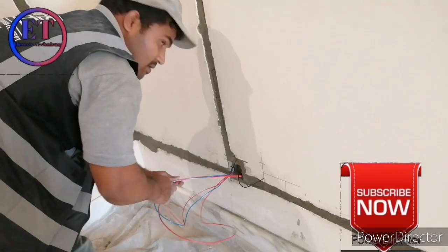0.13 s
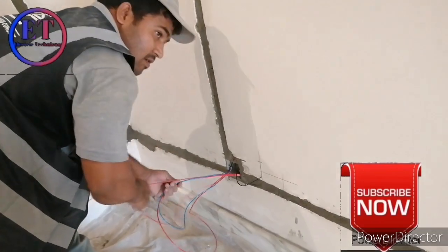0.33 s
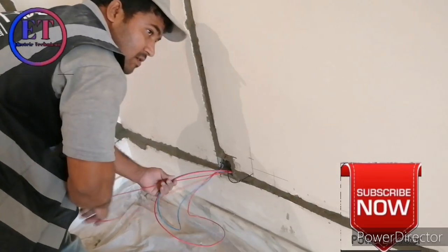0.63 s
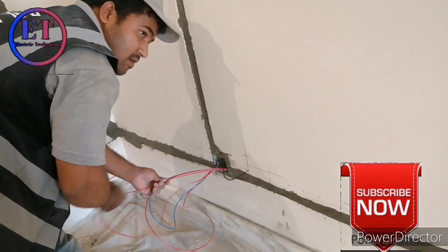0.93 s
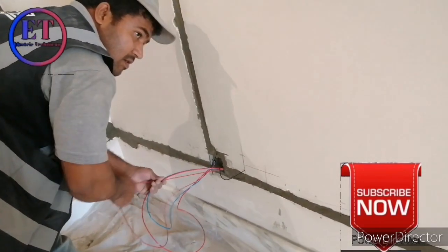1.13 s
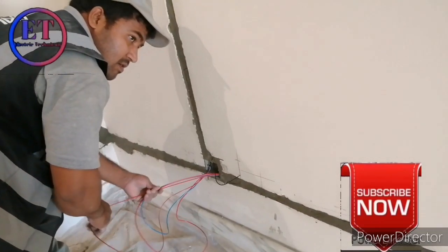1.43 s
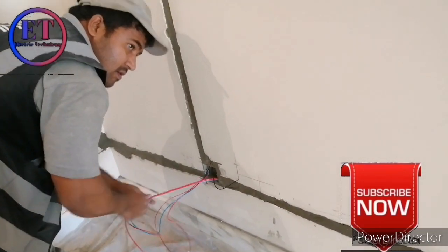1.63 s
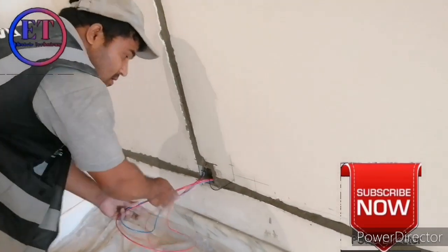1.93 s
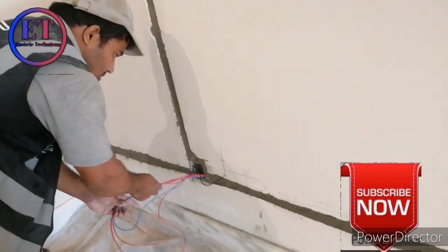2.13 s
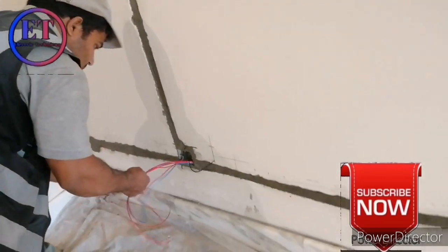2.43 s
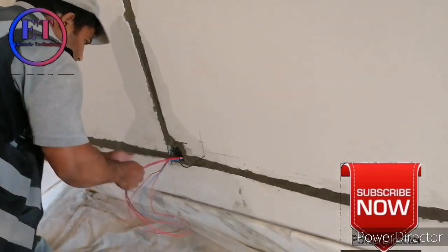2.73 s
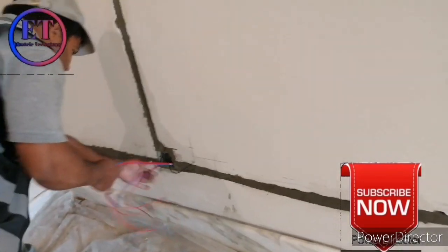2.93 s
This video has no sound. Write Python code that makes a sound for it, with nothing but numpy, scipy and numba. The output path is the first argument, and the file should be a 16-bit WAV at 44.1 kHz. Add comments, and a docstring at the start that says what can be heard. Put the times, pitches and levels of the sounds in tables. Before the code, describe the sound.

A hand power tool switches on in a bare echoing room, winds up to a rushing whine, squeals metallically, then brakes quickly to a stop over faint rumble; close stereo phone pickup.

```python
"""A quiet building-site floor, then a hand power tool is switched on in a bare, echoing room.
It winds up, squeals at full speed, is switched off and brakes to a stop. A sine hum and a narrow-noise
whine follow one shaft-speed curve; jittering sine partials make the squeal, sliding noise bands the
housing resonances, and coloured noise the rushing air and brushes. Noise-built echoes join them
at a phone whose left port is nearer and brighter."""
import sys
import numpy as np
from scipy import signal
from scipy.fft import rfft, irfft
from scipy.io import wavfile
from scipy.ndimage import uniform_filter1d
from numba import njit

SR = 44100
rng = np.random.default_rng(int(sys.argv[2]) if len(sys.argv) > 2 else 0)


def volts_from_decibels(level):
    """Turn decibel levels (scalar or array-like) into linear amplitude factors."""
    exponent = np.asarray(level, float) / 20
    return 10 ** exponent


def log_audio(samples):
    """Write samples as a 16-bit WAV file to the path given in sys.argv[1]."""
    # one column per channel
    frames = np.atleast_2d(samples).T
    # limit to full scale, then quantise
    limited = np.clip(frames, -1, 1)
    pcm = np.round(limited * 32767).astype(np.int16)
    wavfile.write(sys.argv[1], SR, pcm)


N = 136710  # length in samples

# All levels in the tables are relative: gains in the functions and the mix follow.
# Shaft speed and its hum: time_s, shaft_hz, level_db
SHAFT_SPEED = [(.2, 40.05, -64), (.26, 60, -69), (.32, 108.5, -53), (.4, 163.7, -58), (.52, 197, -49),
               (.7, 234, -50), (.87, 259.5, -40.5), (1.1, 274.1, -45), (1.32, 282.4, -37.5),
               (1.6, 291, -49.5), (1.9, 292.5, -53.5), (2.3, 291.6, -57), (2.4, 282.8, -52),
               (2.48, 210.1, -56), (2.6, 111.2, -74), (2.7, 60.8, -76), (2.78, 46.8, -70), (2.9, 30.3, -72)]
# Swelling hum overtones: multiple of the shaft, level_db, swell_centre_s, swell_width_s
HUM_OVERTONES = [(2, -48.5, 1.535, 0.11), (2, -44.5, 1.752, 0.082), (2, -51, 2.06, 0.17),
                 (3, -44.5, 2.113, 0.11), (2, -49, 0.98, 0.23)]
# Whine level: time_s, level_db
WHINE_LEVEL = [(.2, -36.5), (.27, -50), (.32, -44), (.38, -47), (.65, -52), (.82, -48), (1.3, -44.5),
               (1.8, -49), (2.3, -51), (2.37, -48), (2.42, -49), (2.48, -51), (2.54, -53), (2.6, -52),
               (2.75, -64), (2.88, -62.5)]
# Squeal pitch: time_s, fundamental_hz
SQUEAL_PITCH = [(1.44, 2421), (1.58, 2435), (1.8, 2457), (2.1, 2465), (2.17, 2406), (2.28, 2440),
                (2.42, 2488)]
# Squeal flare-ups: time_s, fundamental_db, third_partial_db, other_partials_db
SQUEAL_LEVEL = [(1.44, -49, -54, -50), (1.48, -52, -42, -44), (1.53, -37.5, -42, -39),
                (1.57, -43, -35.5, -40), (1.63, -52, -40, -49), (1.71, -54, -39, -52),
                (1.78, -44, -49, -52), (1.825, -50, -30.5, -40), (1.86, -39.5, -44, -53),
                (1.9, -35.5, -44, -44), (1.945, -46, -43, -53), (1.98, -31.5, -37, -47),
                (2.02, -50, -44, -41), (2.06, -43, -43, -40), (2.11, -34.5, -28.5, -40.5),
                (2.16, -50, -36.5, -45), (2.19, -45, -39, -56), (2.22, -50, -40, -54),
                (2.26, -54, -49, -60), (2.33, -54, -47, -59), (2.42, -48, -46, -54)]
# Squeal spectrum, with weak half lines from alternate strong and weak cycles: multiple, level_db
SQUEAL_SPECTRUM = [(1, 0.6), (2, 0.5), (2.5, -8.5), (3, 1.5), (3.5, -9), (4, -7), (4.5, -15), (5, -17),
                   (5.5, -19), (6, -14)]
# Housing resonances that ring while the speed passes them:
# start_s, hold_s, start_hz, end_hz, start_width_hz (per filter pass), level_db
HOUSING_RINGS = [(0.198, 0.051, 2610, 2630, 250, -38.5), (0.212, 0.095, 830, 960, 500, -33),
                 (0.283, 0.03, 810, 700, 200, -31), (0.296, 0.045, 1900, 2120, 280, -37.5),
                 (0.372, 0.08, 830, 875, 200, -39), (0.57, 0.25, 450, 463, 60, -46),
                 (2.378, 0.042, 5040, 5020, 150, -30.5), (2.442, 0.025, 5070, 5000, 150, -35),
                 (2.475, 0.092, 5060, 5030, 120, -40), (2.401, 0.065, 4500, 4140, 300, -44),
                 (2.45, 0.11, 3770, 3870, 200, -44), (2.401, 0.05, 942, 980, 300, -39),
                 (2.58, 0.065, 2000, 1910, 130, -41.5), (2.657, 0.084, 1970, 1900, 111, -44.5),
                 (2.688, 0.052, 910, 860, 200, -40), (2.741, 0.0076, 835, 850, 120, -33),
                 (2.76, 0.06, 880, 860, 200, -43), (2.883, 0.025, 890, 870, 120, -43),
                 (2.686, 0.2, 1220, 1220, 80, -55)]
# Rushing air and brush noise: time_s, bass_db (120-350 Hz), low_db (350-1400 Hz),
# middle_db (1.4-3.8 kHz), upper_db (3.8-7 kHz), treble_db (7-10.5 kHz)
RUSH_LEVEL = [(0.19, -71, -80, -70, -73, -78), (0.21, -63, -36, -27.5, -44, -57),
              (0.23, -42.5, -38, -41, -47, -55.5), (0.3, -45, -35, -38, -46, -54.5),
              (0.35, -51, -33.5, -35, -47, -53.5), (0.46, -47, -34.5, -35, -42.5, -50),
              (0.68, -48, -35, -32.5, -41, -45), (1.15, -50, -38, -36, -43, -44.5),
              (1.31, -49.5, -37, -35, -42, -44.5), (1.58, -56.5, -40.5, -36.5, -40, -41.5),
              (1.7, -54.5, -39, -38, -40, -41), (1.91, -56, -40, -39, -41, -39),
              (2.08, -48.5, -39, -38.5, -39, -40), (2.15, -51, -44, -40.5, -41.5, -41.5),
              (2.3, -57.5, -38.5, -38.5, -42.5, -43.5), (2.45, -42.5, -40.5, -40, -39, -44),
              (2.63, -68, -45, -44, -51, -57.5), (2.74, -50.5, -39, -46, -52.5, -56),
              (2.89, -76, -46.5, -56, -62, -68.5), (3.1, -62, -54.5, -57.5, -64, -64.5)]
# Top of the rush, above 10.5 kHz: time_s, level_db
RUSH_TOP_LEVEL = [(0.19, -83), (0.23, -69), (0.63, -58.5), (1.44, -57), (1.56, -51), (1.62, -49.5),
                  (2.1, -49), (2.13, -44.5), (2.26, -58), (2.4, -53), (2.63, -86), (2.7, -65), (2.88, -82),
                  (3.1, -74)]
# Edges of the six rush ranges: edge_hz
RUSH_EDGES = [120, 350, 1400, 3800, 7000, 10500, 15400]
# Spectral shape of the rush inside its ranges: frequency_hz, level_db (per Hz)
RUSH_SHAPE = [(100, -30), (152, -21.5), (223, -11), (300, -10), (345, -15), (401, -9), (460, -4),
              (516, -4.5), (624, -8), (838, -9), (912, -3), (1150, -10), (1250, -11.5), (1680, -16),
              (2210, -12.5), (2780, -7.5), (3160, -12.5), (4060, -22.5), (5120, -16), (6060, -21),
              (8490, -25), (11000, -34.5), (15300, -39.5)]
# Tone colour of the direct whine and rush: frequency_hz, gain_db
DIRECT_COLOUR = [(250, -1), (550, -9), (1050, 0), (2000, -3.5), (4000, -7), (9000, -7.5)]
# Spectral shape of the building site: frequency_hz, level_db (per Hz)
SITE_SHAPE = [(12, -28), (20, -3), (85, -8.5), (152, -9), (190, -15), (350, -13.5), (900, -17), (2010, -30),
              (2590, -27), (3810, -56), (15300, -56)]
# Site noise level, turned down by the recorder's gain while the tool is loud: time_s, level_db
SITE_DRIFT = [(.2, -2.5), (.8, -3.5), (1.8, -8.5), (2.3, -6), (2.6, -2.5), (3.1, 2.5)]
# Left over right tone, split about evenly between the ports: frequency_hz, difference_db
PORT_TONE = [(60, 3), (110, -6), (200, 3), (380, -1.5), (700, 5), (1290, -2.5), (2380, -2), (4400, -0.5),
             (8120, 10.5), (15000, 13)]


def unit(x):
    """Scale to an rms of 1."""
    return x / np.sqrt(np.mean(x ** 2, axis=-1, keepdims=True))


def curve(table, col):
    """A table column joined by straight lines in time."""
    rows = np.array(table, float)
    return np.interp(np.arange(N) / SR, rows[:, 0], rows[:, col])


def colour(x, points, share=1):
    """Filter by (Hz, dB) points on a log-frequency axis; share scales the dB."""
    rows = np.array(points, float)
    hz = np.arange(N // 2 + 1) * SR / N + 1
    gain_db = np.interp(np.log(hz), np.log(rows[:, 0]), rows[:, 1])
    return irfft(rfft(x) * volts_from_decibels(share * gain_db), N)


def walk(rate):
    """Random levels held 1 / rate s and slewed twice; spread near 1."""
    hold = int(SR / rate)
    steps = np.repeat(rng.standard_normal(N // hold + 1), hold)
    return 4 / 3 * uniform_filter1d(uniform_filter1d(steps, hold), hold)[:N]


@njit
def svf(x, hz, width):
    """State-variable band-pass with moving centre, gain 1 at the centre."""
    y, band, low = np.empty(len(x)), 0., 0.
    for i in range(len(x)):
        g, damping = np.tan(np.pi * hz[i] / SR), width[i] / hz[i]
        v = (band + g * (x[i] - low)) / (1 + g * (g + damping))
        band, low, y[i] = 2 * v - band, low + 2 * g * v, damping * v
    return y


def moving_band(hz, spread):
    """Noise in a steep band that follows hz, at constant power; spread is width over centre."""
    once = svf(rng.standard_normal(N), hz, spread * hz)
    twice = svf(once, hz, spread * hz)
    return unit(twice / np.sqrt(hz))


def hum(shaft_hz):
    """The unbalanced shaft: a wavering tone whose overtones swell and fade."""
    t = np.arange(N) / SR
    turn = 2 * np.pi * np.cumsum(shaft_hz) / SR
    out = volts_from_decibels(curve(SHAFT_SPEED, 2) + 2.4 * walk(14) - 4.5) * np.sin(turn)
    for multiple, db, centre, width in HUM_OVERTONES:
        swell = np.exp(-((t - centre) / width) ** 2)
        out = out + volts_from_decibels(db + 1.5 * walk(11.23)) * swell * np.sin(multiple * turn)
    return np.sqrt(2) * out * (t > SHAFT_SPEED[0][0])


def whine(shaft_hz):
    """A rough tone tied to speed: narrow noise on the 18th multiple of the shaft."""
    band = moving_band(18 * shaft_hz, 0.032)
    level = volts_from_decibels(curve(WHINE_LEVEL, 1) + 2.2 * walk(30.46))
    return level * band * (np.arange(N) / SR > WHINE_LEVEL[0][0])


def squeal():
    """A jittering metal squeal; every partial flickers on its own."""
    t = np.arange(N) / SR
    jitter = 1 + 0.004 * walk(150) + 0.002016 * walk(15)
    phase = 2 * np.pi * np.cumsum(curve(SQUEAL_PITCH, 1) * jitter) / SR
    tone = 0
    for multiple, db in SQUEAL_SPECTRUM:
        column = {1: 1, 3: 2}.get(multiple, 3)
        level = volts_from_decibels(db + curve(SQUEAL_LEVEL, column) + 2.1 * walk(24.98))
        tone = tone + level * np.sin(multiple * phase + multiple)
    # fades in and out over 18 ms
    gate = np.clip(np.minimum(t - SQUEAL_LEVEL[0][0], SQUEAL_LEVEL[-1][0] - t) / 0.018, 0, 1)
    return np.sqrt(2) * volts_from_decibels(-2.5) * gate * tone


def rings():
    """Each housing resonance flares, slides in pitch, holds unevenly and dies."""
    attack_s, t60_s, steady_s = 0.0048, 0.1, 0.025
    t, out = np.arange(N) / SR, 0
    for start, hold, hz, end_hz, width, db in HOUSING_RINGS:
        attack = np.clip((t - start) / attack_s, 0, 1)
        decay = volts_from_decibels(-60 * np.maximum(t - start - hold, 0) / t60_s)
        band = moving_band(np.interp(t, [start, start + hold], [hz, end_hz]), width / hz)
        # evens out the slower swells of the noise
        band = band / np.sqrt(uniform_filter1d(band ** 2, int(steady_s * SR)))
        out = out + volts_from_decibels(db - 3 + 1.3 * walk(30.24)) * attack * decay * band
    return out


def rush(shaft_hz):
    """Coloured air noise, each range flickering on its own level, the middle with a climbing hump."""
    out, hz = 0, np.arange(N // 2 + 1) * SR / N
    for k in range(6):
        noise = colour(rng.standard_normal(N), RUSH_SHAPE)
        inside = (hz >= RUSH_EDGES[k]) & (hz < RUSH_EDGES[k + 1])
        band = unit(irfft(rfft(noise) * inside, N))
        if k == 2:
            # the broad fan hump climbs with speed, never below 2 kHz
            hump = moving_band(np.maximum(10.91 * shaft_hz, 2000), 0.23)
            band = unit(band + volts_from_decibels(0.5) * (shaft_hz / shaft_hz.max()) ** 2 * hump)
        level_db = curve(RUSH_LEVEL, k + 1) if k < 5 else curve(RUSH_TOP_LEVEL, 1)
        out = out + volts_from_decibels(level_db + 0.5 * walk(24.88) - 1.5) * band
    return out


def wide(mid, side):
    """Left and right share the bass and part in the treble, from about 860 Hz."""
    side = signal.lfilter(*signal.butter(1, 860, "high", fs=SR), side)
    return np.array([mid + side, mid - side]) / np.sqrt(2)


def echo_tail(t):
    """Diffuse stereo tail: noise that decays faster in the treble, with dense first reflections."""
    t60_s, treble_t60_s = 0.66, 0.33
    early_t60_s, early_db = 0.075, 6.5  # level against the start of the long tail
    noise = rng.standard_normal((2, len(t)))
    low = signal.lfilter(*signal.butter(1, 1500, fs=SR), noise)
    late = low * volts_from_decibels(-60 * t / t60_s) + (noise - low) * volts_from_decibels(-60 * t / treble_t60_s)
    early = noise * volts_from_decibels(early_db - 60 * t / early_t60_s)
    tail = wide(*(late + early) * (t > .004))
    return tail / np.sqrt(np.sum(tail ** 2) / 2)


def room(noises, tones, body):
    """Direct sound, late at the right port, and a tail whose pattern changes as the hand-held tool shifts."""
    shift_s, right_lag = 0.12, 21  # lag in samples
    room_db, tone_room_db = 5.5, -9  # tail against direct sound; tones and rings into the tail
    t, step = np.arange(int(.7 * SR)) / SR, int(shift_s * SR)
    fade = np.sin(np.pi * np.arange(2 * step) / (2 * step))
    wet = np.zeros((2, N + 4 * step + len(t)))
    # the tones are heard mostly direct, with little echo
    source = colour(noises, DIRECT_COLOUR) + tones
    feed = noises + volts_from_decibels(tone_room_db) * (tones + body)
    padded = np.r_[np.zeros(step), feed, np.zeros(2 * step)]
    # overlapping stretches of sound each get a fresh tail
    for start in range(0, N + step, step):
        stretch = padded[start:start + 2 * step] * fade
        part = signal.fftconvolve(stretch[None], echo_tail(t), axes=1)
        wet[:, start:start + part.shape[1]] += part
    # the housing's ring reaches both ports together
    direct = np.array([source, np.roll(source, right_lag)]) + body
    return (direct + volts_from_decibels(room_db) * wet[:, step:step + N]) / np.sqrt(1 + volts_from_decibels(2 * room_db))


def site():
    """Quiet rumble and hiss of the building site: coloured noise with a slowly wavering level."""
    mid, side = (colour(rng.standard_normal(N), SITE_SHAPE) for _ in range(2))
    # a little full-band difference keeps the bass from being quite the same at both ports
    floor = unit(wide(mid, side) + 0.12 * np.array([side, -side]))
    return floor * volts_from_decibels(-54 + curve(SITE_DRIFT, 1) + 1.3 * walk(11.0))


def scene():
    """Tool in the room over the site floor, as the two ports receive it."""
    shaft_hz = curve(SHAFT_SPEED, 1) * (1 + 0.0029 * walk(22))
    tones = volts_from_decibels(6.0) * (hum(shaft_hz) + squeal())
    noises = whine(shaft_hz) + rush(shaft_hz)
    body = volts_from_decibels(4.0) * rings()
    left, right = room(noises, tones, body) * volts_from_decibels(3.5) + site()
    return np.array([colour(left, PORT_TONE, .5), colour(right, PORT_TONE, -0.52)])


def low_pass(x):
    """Removes everything above the highest recorded frequency."""
    return signal.sosfilt(signal.butter(12, 15680, fs=SR, output="sos"), x)


def record(dry):
    """The phone cuts the top steeply above 15.15 kHz."""
    top_cut = signal.ellip(8, .2, 70, 15150, fs=SR, output="sos")
    mix = signal.sosfilt(top_cut, dry)
    return low_pass(mix)


dry = scene()
out = record(dry)
log_audio(out)
```